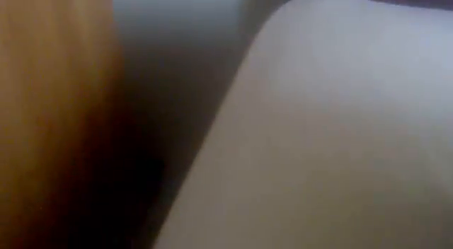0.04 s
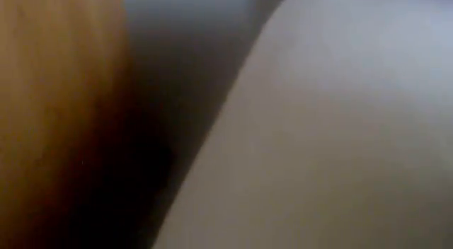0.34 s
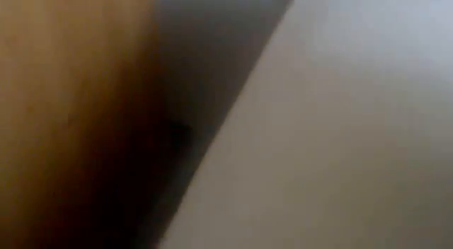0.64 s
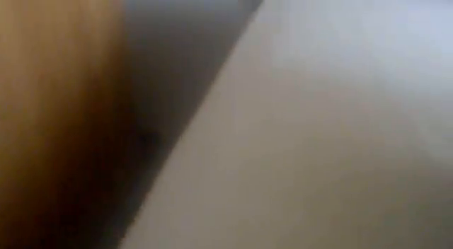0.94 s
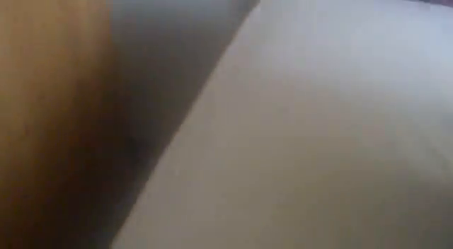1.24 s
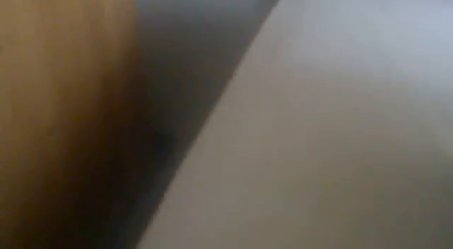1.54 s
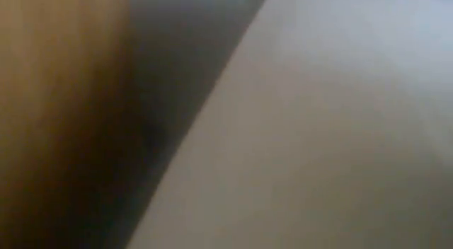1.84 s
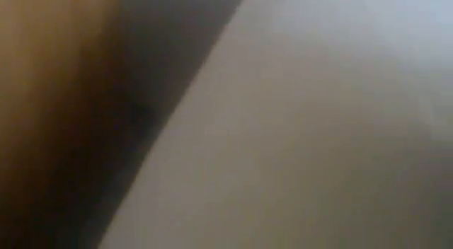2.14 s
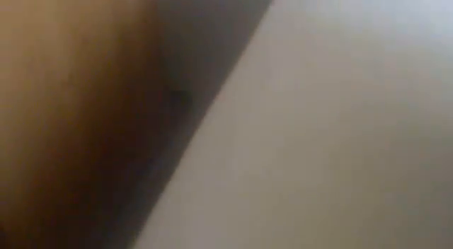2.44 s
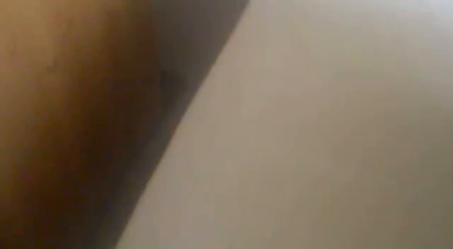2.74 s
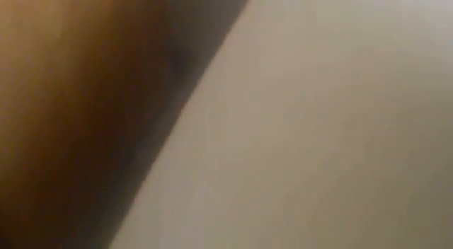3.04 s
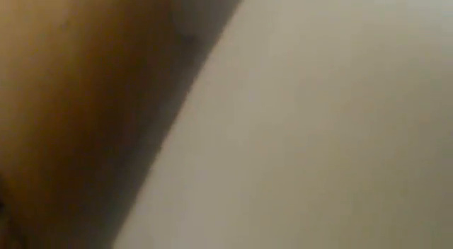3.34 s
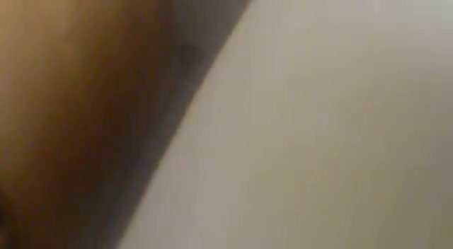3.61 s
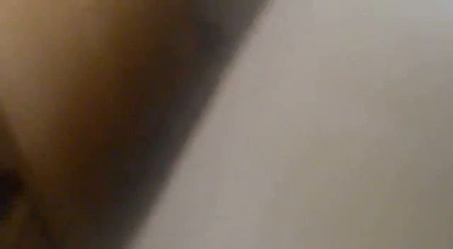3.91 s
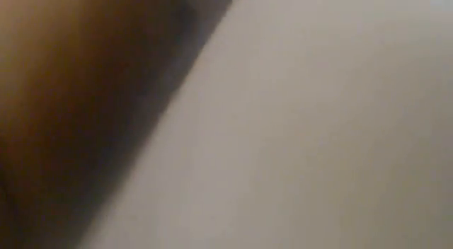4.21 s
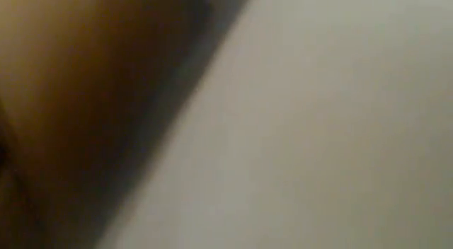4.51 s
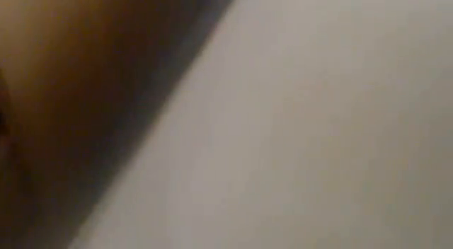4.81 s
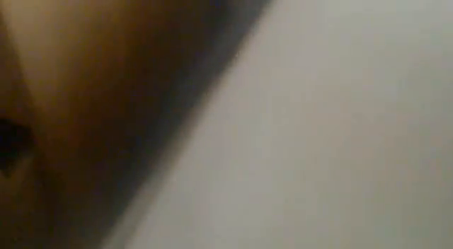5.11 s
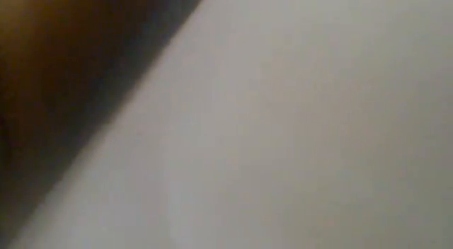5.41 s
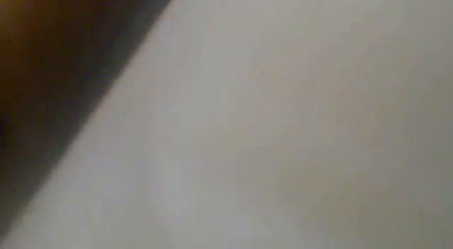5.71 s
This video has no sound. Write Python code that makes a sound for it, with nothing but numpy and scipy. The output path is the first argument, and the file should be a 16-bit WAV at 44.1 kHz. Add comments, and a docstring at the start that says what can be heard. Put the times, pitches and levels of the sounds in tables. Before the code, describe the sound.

Close to a steel computer case in a small quiet room, a light click comes at the very start. From about 0.8 seconds a hard drive scrapes briefly along its rails with ticks and a faint squeak, then knocks sharply against the cage at 1.1 seconds. More short scrapes and clicks lead to another knock at 1.9 seconds. Between 2.2 and 2.4 seconds comes a quick clattering cluster, with the loudest clank at 2.3 seconds seating the drive. Two tiny chinks fall just before and after it. Lighter taps follow around 2.7 and 3.6 seconds, with sharp ticks near 3.8. Short scrapes and thin squeaks lead to a moderate knock at 5 seconds. Around 5.5 seconds there are more scrapes, clicks and a soft low boom from the side panel, then a last light tap at 5.7. Faint room air and hum lie underneath.

```python
"""A small quiet room, close to a sheet-steel computer case: a hard drive is worked into its bay.
The drive scrapes along the rails, steel slipping on steel, with faint squeaks and two brief chinks.
It knocks against the cage, which thumps, clatters and rings; the loudest knock seats it. Small parts
tick in between and the side panel booms softly under a leaning hand, over room air and a faint hum."""
import sys
import numpy as np
from scipy import signal
from scipy.fft import rfft, irfft, next_fast_len
from scipy.io import wavfile

SR = 44100
rng = np.random.default_rng(int(sys.argv[2]) if len(sys.argv) > 2 else 0)


def bounce(signal):
    """Save signal as a 16-bit WAV file at the path given by the first command-line argument."""
    frames = np.transpose(np.atleast_2d(signal))
    limited = np.clip(frames, -1, 1)
    pcm = np.round(limited * 32767).astype(np.int16)
    wavfile.write(sys.argv[1], SR, pcm)


N = 254104
TIME = np.arange(N) / SR
BAND_EDGES_HZ = np.geomspace(22, 17000, 27)
BAND_HZ = np.sqrt(BAND_EDGES_HZ[1:] * BAND_EDGES_HZ[:-1])
FIRM_DB = -21.5   # a firm blow, on the scale of the knocks' mids

# The drive hitting the cage: (time [s], mids level [dB], body [dB re mids], treble [dB re mids],
# clatter t60 [s], thump pitch [Hz], clank pitch [Hz])
KNOCKS = [(1.101, -19, 0.5, -3.5, 0.2, 273, 1614), (1.943, -20, -2.5, -2, 0.28, 303, 1378),
          (2.227, -19, -18.5, 4.5, 0.17, 366, 1840), (2.281, -26.5, -9, -1, 0.19, 332, 1510),
          (2.299, -5, -13, -4, .14, 572.6, 1775), (2.365, -26, -8.5, 2.5, .12, 350, 959),
          (2.749, -38, -12, -4.5, 0.25, 563, 1746), (3.185, -56.5, 9.5, -2, 0.22, 339, 1223),
          (3.588, -33, -1, -1, 0.19, 435, 1078), (3.801, -45, 1.5, -7, 0.11, 228.5, 2020),
          (4.403, -45.5, 7, -1.5, 0.19, 517, 1176), (4.954, -27.5, -0.5, -4, 0.2, 290, 1097),
          (5.238, -53.5, 7.5, -6, 0.36, 211.4, 1482), (5.722, -39, -3.5, -16.5, 0.16, 358, 1334)]
# The wash of crowded panel modes: (frequency [Hz], level [dB], decay time [multiple of a hit's t60])
CLATTER = [(40, -12.5, 1.6), (80, -4, 1.6), (160, -5.5, 1.4), (294, -7, 1.3), (516, -8, 1.3),
           (694, -13, 1.2), (1250, -9.5, 1.1), (2060, -9, 1.05), (4000, -2.5, 1.0), (5970, -3.5, .85),
           (8740, -6, .7), (10800, -16, .6), (15000, -18, .6)]
# The clear notes of the case: (pitch [Hz], level [dB], t60 [s])
CASE_MODES = [(78, -6, .7), (146, -16, .6), (188, -3, .3), (275, -5, .2), (352, -9, .34), (505, -9, .25),
              (572, -8, .24), (905, -13, .2), (972, -14, .2), (1200, -14, .17), (1550, -12, .15),
              (1761, -7.5, .16), (2350, -11, .15), (2430, -12, .14), (2650, -12, .17), (3315, -12, .19),
              (3545, -10, .18), (3580, -12, .18), (3758, -13, .16), (3960, -11, .17), (4262, -12, .17),
              (4340, -12, .16)]
# Pushes along the rails: (start [s], length [s], level [dB], rumble offset [dB], hiss offset [dB])
PUSHES = [(0.499, 0.1, -70, 7.5, -18), (0.841, 0.11, -52.5, -1, -6), (0.958, 0.21, -57, -2.5, -6),
          (1.479, 0.027, -54, -4, -0.5), (1.539, 0.081, -51.5, 2, -2), (1.818, 0.049, -56, -2, 2),
          (2.875, 0.046, -64, 6, -14.5), (3.053, 0.027, -57.5, -7.5, -14), (3.444, 0.026, -58, 7.5, -11.5),
          (3.749, 0.056, -54, -9, 4), (3.885, 0.035, -45.5, 1.5, -12.5), (4.066, 0.074, -58, -1, -1),
          (4.525, 0.024, -54, 7, -8.5), (4.721, 0.09, -54, 3, -0.5), (4.78, 0.029, -42, 3.5, -13),
          (4.89, .05, -54, 2.5, -20), (5.19, 0.062, -53.5, -3.5, -1), (5.237, 0.042, -59.5, 9.5, -3.5),
          (5.49, 0.058, -45.5, 7, 0), (5.554, 0.054, -44.5, 4.5, -8)]


def from_db(db):
    """Decibels to gain."""
    return 10 ** (np.asarray(db) / 20)


def rms_one(x):
    """Scale to rms 1."""
    return x / np.sqrt(np.mean(x ** 2) + 1e-20)


def at_hz(points, hz, column=1):
    """Read a column of a table on a log-frequency axis."""
    points = np.array(points)
    return np.interp(np.log(hz), np.log(points[:, 0]), points[:, column])


def fade(t, t60):
    """Exponential decay, 60 dB down at t60."""
    return np.exp(-np.log(1000) * t / np.maximum(t60, 1e-3))


def add(out, start_s, sound):
    """Mix a sound in at its start time."""
    i = max(round(start_s * SR), 0)
    out[i:i + len(sound)] += sound[:N - i]


def filtered(x, hz, kind="low", order=2):
    """Butterworth filter."""
    return signal.sosfilt(signal.butter(order, hz, kind, fs=SR, output="sos"), x)


def wobble(rate_hz):
    """Smooth random movement; rms 1."""
    return rms_one(filtered(rng.standard_normal(N), rate_hz))


def noise_bands(size):
    """Noise bands of rms 1; neighbours are cut from independent noises."""
    noises = rng.standard_normal((2, size))
    bands = zip(BAND_EDGES_HZ, BAND_EDGES_HZ[1:])
    return np.array([rms_one(filtered(noises[k % 2], band, "band")) for k, band in enumerate(bands)])


def coloured(source, spectrum):
    """Give a white source a spectrum; rms 1."""
    size = next_fast_len(N)
    hz = np.maximum(np.fft.rfftfreq(size, 1 / SR), 1)
    return rms_one(irfft(rfft(source, size) * from_db(at_hz(spectrum, hz)), size)[:N])


def dying_noise(t60, gains, size=26000):
    """The tail of countless modes, each band dying at its own rate; energy 1."""
    response = gains @ (noise_bands(size) * fade(TIME[:size], t60[:, None]))
    return response / np.linalg.norm(response)


def ring(force, hz, t60):
    """One mode: a unit click sets a sine of height 1 ringing."""
    radius, angle = fade(1 / SR, t60), 2 * np.pi * hz / SR
    return signal.lfilter([0, np.sin(angle)], [1, -2 * radius * np.cos(angle), radius ** 2], force + 1e-18)


def background(air_db, hum_db, hum_hz):
    """The bed: quiet room air with a trace of hiss and a faint hum."""
    # Room tone: (frequency [Hz], spectral level [dB])
    air_spectrum = [(20, -6.5), (35, -1), (55, -4), (80, 0.5), (105, -15), (170, -7), (240, -14.5),
                    (345, -7.5), (430, -14), (600, -12.5), (900, -18), (2000, -20), (8000, -24.5),
                    (16000, -23.5)]
    hum = from_db(hum_db) * np.sqrt(2) * np.sin(2 * np.pi * hum_hz * TIME)
    return from_db(air_db) * coloured(rng.standard_normal(N), air_spectrum) + hum


def room(x, wet_db):
    """The diffuse tail of a small furnished room."""
    # Reverb time: (frequency [Hz], t60 [s])
    decay_times = [(60, .85), (300, 0.41), (1200, 0.38), (4000, 0.3), (14000, 0.21)]
    tail = dying_noise(at_hz(decay_times, BAND_HZ), np.sqrt(BAND_HZ))
    return from_db(wet_db) * signal.fftconvolve(x, tail)[:N]


def case_echoes(x, echo_db, t60, count=14):
    """Quick echoes between the walls of the case give a hollow, uneven colour."""
    response = np.zeros(500)
    lags = rng.integers(25, 500, count)
    response[lags] = from_db(echo_db) * fade(lags / SR, t60) * rng.choice([-1, 1], count)
    response[0] = 1
    return signal.fftconvolve(x, response / np.linalg.norm(response))[:N]


def swells(cues, waver, waver_hz):
    """Short tones of unsteady pitch that swell and fade."""
    out = np.zeros(N)
    unsteady_time = np.cumsum(1 + waver * wobble(waver_hz)) / SR
    for centre, length, level_db, hz in cues:
        span = np.abs(TIME - centre) < 2 * length
        envelope = np.exp(-(2 * (TIME[span] - centre) / length) ** 2)
        out[span] += from_db(level_db) * np.sqrt(2) * np.sin(2 * np.pi * hz * unsteady_time[span]) * envelope
    return out


def panel_booms():
    """The side panel flexes under a leaning hand and booms softly."""
    # Presses of the hand: (centre time [s], length [s], level [dB], pitch [Hz])
    presses = [(2.113, 0.084, -40.5, 34.05), (2.246, 0.036, -35, 67.7), (3.69, 0.13, -51, 80),
               (5.269, 0.15, -54, 75.55), (5.538, 0.036, -41, 80), (5.587, 0.11, -40.5, 80)]
    return swells(presses, waver=0.25, waver_hz=25)


def squeaks_and_chinks():
    """Thin, faint squeaks of the rails and two brief metallic chinks."""
    # Rail squeaks, and chinks at 2.12 s and 2.508 s: (centre time [s], length [s], level [dB], pitch [Hz])
    high_tones = [(.865, 0.062, -63, 4620), (.91, 0.018, -47, 3930), (2.12, 0.0036, -34, 4910),
                  (2.508, 0.023, -47.5, 3780), (3.04, 0.11, -69.5, 3990), (4.76, 0.054, -56.5, 2580),
                  (4.935, 0.052, -55.5, 2800)]
    return swells(high_tones, waver=0.06, waver_hz=410)


def stray_ticks(settle_db=-43.5, catch_db=12.5, pitch_range_hz=(1590, 4400)):
    """Cues for faint ticks: loose parts settle after each firm knock, the rails catch once a push."""
    firm_times = [time for time, blow_db, *_ in KNOCKS if blow_db > FIRM_DB - 4]
    settling = [(time + rng.uniform(0.1, 0.33), settle_db) for time in firm_times for _ in range(5)]
    catching = [(start + length * rng.random(), push_db + catch_db) for start, length, push_db, *_ in PUSHES]
    return [(time, level_db, rng.uniform(*pitch_range_hz), 0) for time, level_db in settling + catching]


def part_ticks(gain_db, width, contact_t60, rattle_t60, bounce_s, bounce_db, top_hz, size=1500):
    """A brief contact rings a small stiff part, bounces once and leaves a broad rattle in the case."""
    # Small parts touching: (time [s], level [dB], pitch [Hz], send to the case [dB])
    contacts = [(0.121, -25, 2740, -13), (0.243, -45, 2500, 0), (0.319, -56.5, 1800, 6),
                (0.592, -51, 2690, 2), (0.9, -32, 3400, 1.5), (0.964, -39, 3480, 7),
                (1.02, -33.5, 2590, -14), (1.041, -38.5, 3900, 3), (1.05, -32, 3560, -20),
                (1.555, -32.5, 3200, 3.5), (1.57, -31, 3000, 2.5), (1.671, -37, 3040, 5),
                (1.821, -38, 4540, -11), (1.831, -22.5, 4160, -6), (2.118, -34.5, 4880, 12),
                (2.564, -39, 3740, .5), (2.785, -30.5, 4140, 5), (3.187, -38, 2650, 0),
                (3.427, -42.5, 3930, -3.5), (3.505, -44.5, 2400, 4), (3.715, -45, 2080, 3.5),
                (3.801, -24, 3150, -5), (3.89, -27, 4000, -4.5), (3.93, -29, 2180, -13.5),
                (4.545, -36, 3720, -3), (4.788, -31, 1800, 5.5), (4.891, -31.5, 3370, 2),
                (5.237, -34, 1570, 1), (5.384, -32, 1910, -4), (5.427, -41.5, 1880, 8),
                (5.587, -26.5, 2740, -2)]
    direct, case_send = np.zeros((2, N))
    for time, level_db, hz, send_db in contacts + stray_ticks():
        contact = rng.standard_normal(size) * fade(TIME[:size], contact_t60)
        tick = filtered(contact, [hz / (1 + width), hz * (1 + width)], "band")
        tick *= from_db(level_db + gain_db) / np.abs(tick).max()
        add(direct, time, tick)
        add(direct, time + bounce_s * rng.uniform(0.7, 1.3), from_db(bounce_db) * tick)
        add(case_send, time, from_db([send_db]) * np.linalg.norm(tick))
    rattle_colour = np.sqrt(BAND_HZ) / (1 + (BAND_HZ / 6000) ** 2)
    rattle = dying_noise(rattle_t60 * at_hz(CLATTER, BAND_HZ, column=2), rattle_colour)
    return filtered(direct + signal.fftconvolve(case_send, rattle)[:N], top_hz, order=3)


def push(start, length, t60, grip_s=0.018):
    """Envelope of one push: it takes hold, holds and runs out."""
    return np.clip((TIME - start) / grip_s, 0, 1) * fade(np.maximum(TIME - start - length, 0), t60)


def friction(slips_per_s=300, spread_db=1.5, slip_t60=0.031, pressure_db=3.5):
    """Tiny slips of steel on steel ride on a smooth rub, under the uneven pressure of the hand."""
    strengths = from_db(spread_db * np.minimum(rng.exponential(1, N), 2))
    onsets = strengths * (rng.random(N) < slips_per_s / SR)
    slips = signal.fftconvolve(onsets, fade(TIME[:500], slip_t60))[:N] * rng.standard_normal(N)
    pressure = from_db(pressure_db * wobble(rate_hz=30.9))
    rub = rng.standard_normal(N)
    return rms_one(rms_one(slips) + rub) * pressure


def rail_scrape(rasp_db, rumble_db, hiss_db, resonance_db):
    """The drive rasps and hisses along the rails; the cage rumbles and its modes sing along."""
    # Gritty mids of the rails: (frequency [Hz], spectral level [dB])
    rasp_spectrum = [(400, -7.5), (700, -7), (1100, 2.5), (2000, 0), (3000, -2), (4300, -4), (5500, -32),
                     (9000, -33)]
    # Low end of the cage: (frequency [Hz], spectral level [dB])
    rumble_spectrum = [(50, -15), (85, 4.5), (130, -9.5), (200, -0.5), (340, -4.5), (600, -0.5), (850, -17),
                       (1500, -44.5)]
    # Fine top of the rub: (frequency [Hz], spectral level [dB])
    hiss_spectrum = [(3000, -23), (4700, 7), (6500, 0.5), (8500, -4.5), (11000, -11), (16000, -16)]
    rasp, rumble, hiss = np.zeros((3, N))
    for start, length, push_db, low_db, fine_db in PUSHES:
        stroke, lingering = push(start, length, t60=0.21), push(start, length, t60=0.33)
        rasp = np.maximum(rasp, from_db(push_db + rasp_db) * stroke)
        hiss = np.maximum(hiss, from_db(push_db + fine_db + hiss_db) * stroke)
        rumble = np.maximum(rumble, from_db(push_db + low_db + rumble_db) * lingering)
    grit = friction()
    scrape = rasp * coloured(grit, rasp_spectrum)
    scrape += rumble * coloured(grit, rumble_spectrum)
    scrape += hiss * coloured(grit, hiss_spectrum)
    # each mode is scaled to unity gain at its own pitch
    singing = sum(ring(scrape, hz, t60) * 2 * np.log(1000) / (t60 * SR) for hz, _, t60 in CASE_MODES)
    return scrape + from_db(resonance_db) * singing


def knock_colour(blow_db, body_db, treble_db, hz):
    """A blow's level at hz, in dB: the spot sets body and treble; softer blows are boomier and duller."""
    # Where boom, body, mids, treble and sheen sit: (frequency [Hz])
    colour_hz = [80, 300, 1300, 3900, 9000]
    softer_db = FIRM_DB - blow_db
    boom_db = -20 + 0.36 * softer_db
    sheen_db = treble_db - 4.5 - 0.69 * max(softer_db, 0)
    return blow_db + np.interp(np.log(hz), np.log(colour_hz), [boom_db, body_db, 0, treble_db, sheen_db])


def knock_thump(thump_db, clank_db, t60):
    """The struck cage wall gives a low thump and a hollow clank whose pitches depend on the spot."""
    out, t = np.zeros(N), TIME[:16000]
    envelope = (1 - fade(t, t60=0.021)) * fade(t, t60)
    for time, blow_db, body_db, _, _, thump_hz, clank_hz in KNOCKS:
        thump = from_db(body_db + thump_db) * np.sin(2 * np.pi * thump_hz * t)
        clank = from_db(clank_db) * np.sin(2 * np.pi * clank_hz * t)
        add(out, time, from_db(blow_db) * (thump + clank) * envelope)
    return out


def knock_ring(gain_db, uneven_db):
    """Each blow rings the clear modes of the case; the point of contact favours other ones each time."""
    out = np.zeros(N)
    hits = [round(time * SR) for time, *_ in KNOCKS]
    for hz, mode_db, t60 in CASE_MODES:
        colour_db = np.array([knock_colour(blow, body, treble, hz) for _, blow, body, treble, *_ in KNOCKS])
        spot_db = uneven_db * rng.standard_normal(len(hits))
        force = np.zeros(N)
        force[hits] = from_db(gain_db + mode_db + colour_db + spot_db) * rng.choice([-1, 1], len(hits))
        # a mode takes a few milliseconds to fill
        out += ring(force, hz, t60) - ring(force, hz, t60=0.015)
    return out


def knock_clatter(gain_db, chatter_s, swell_s, crack, crack_t60, size=24000):
    """Each blow spreads through the panels and dies as a dense clatter, treble first."""
    out, t = np.zeros(N), TIME[:size]
    noise = noise_bands(4 * size)
    # the sound builds up as it spreads, the bass most slowly
    attack = 1 - np.exp(-(t / (swell_s + 0.32 / BAND_HZ[:, None])) ** 2)
    # the first hard contact adds a short bright crack
    attack *= 1 + crack * fade(t, crack_t60) / (1 + (5000 / BAND_HZ[:, None]) ** 2)
    decay_scale = at_hz(CLATTER, BAND_HZ, column=2)[:, None]
    for time, blow_db, body_db, treble_db, t60, _, _ in KNOCKS:
        band_db = gain_db + at_hz(CLATTER, BAND_HZ) + knock_colour(blow_db, body_db, treble_db, BAND_HZ)
        # the drive chatters for a moment before the decay sets in
        envelope = attack * fade(np.maximum(t - chatter_s, 0), t60 * decay_scale)
        offset = rng.integers(3 * size)
        bands = noise[:, offset:offset + size] * envelope
        energy_trim = np.linalg.norm(envelope, axis=1) / np.linalg.norm(bands, axis=1)
        add(out, time, (energy_trim * from_db(band_db)) @ bands)
    return out


def scene():
    """The mono mix: the case up close, its room tail and the bed."""
    clatter = knock_clatter(gain_db=-1.5, chatter_s=0.006, swell_s=0.0023, crack=0.61, crack_t60=0.039)
    scrape = rail_scrape(rasp_db=-3.5, rumble_db=-5.5, hiss_db=-4.5, resonance_db=2.0)
    case = case_echoes(clatter, echo_db=-14, t60=0.05) + case_echoes(scrape, echo_db=-7.5, t60=0.17)
    case += knock_ring(gain_db=-1.6, uneven_db=3.0)
    case += knock_thump(thump_db=3.5, clank_db=-4.0, t60=0.15)
    case += part_ticks(gain_db=-2.0, width=0.36, contact_t60=0.0055, rattle_t60=0.071,
                       bounce_s=0.0033, bounce_db=-10, top_hz=6277)
    case += panel_booms() + squeaks_and_chinks()
    return (case + room(case, wet_db=-14.5) + background(air_db=-66.5, hum_db=-81, hum_hz=344.5))[None]


def record(dry):
    """A soft clip rounds the loudest peaks and a steep low-pass cuts the top."""
    ceiling, cutoff_hz = 0.72, 16000
    rounded = dry / (1 + (dry / ceiling) ** 4) ** (1 / 4)
    return signal.sosfilt(signal.ellip(10, 0.1, 80, cutoff_hz, fs=SR, output="sos"), rounded)


dry = scene()
out = record(dry)
bounce(out)
```